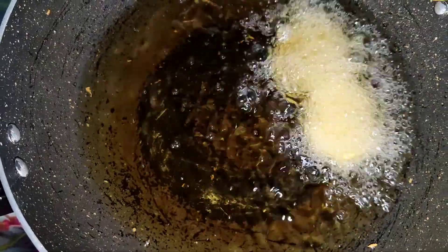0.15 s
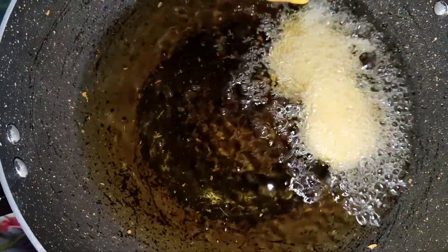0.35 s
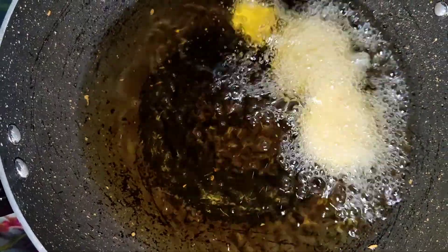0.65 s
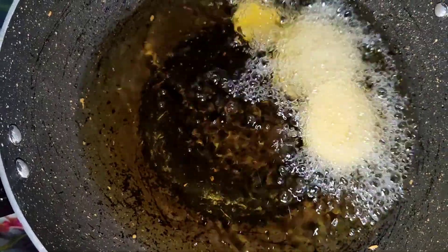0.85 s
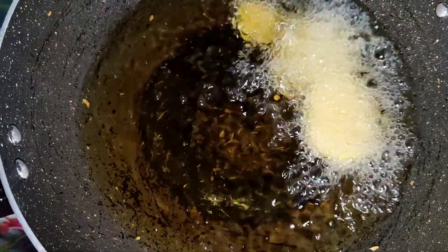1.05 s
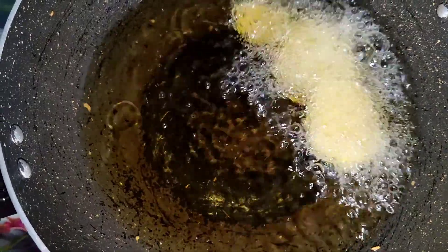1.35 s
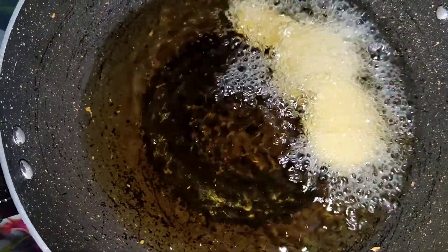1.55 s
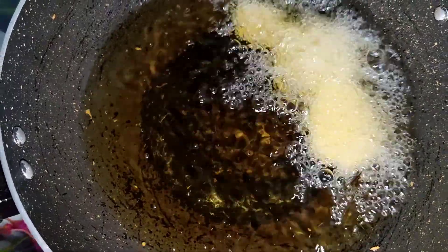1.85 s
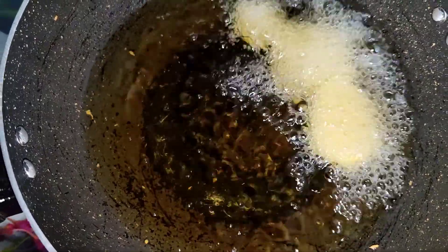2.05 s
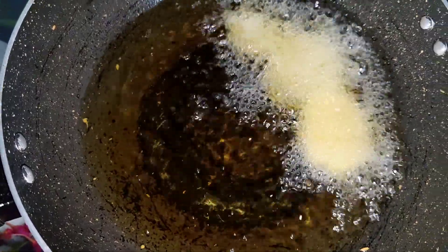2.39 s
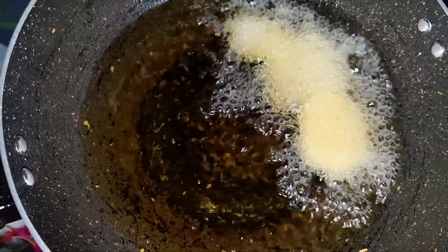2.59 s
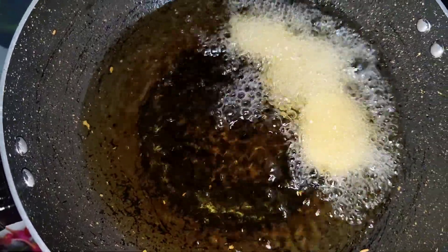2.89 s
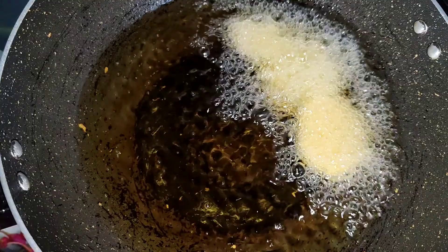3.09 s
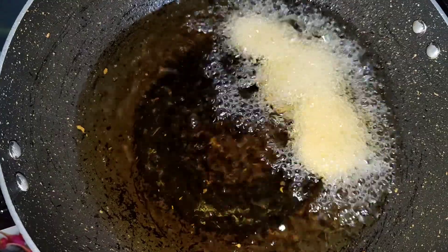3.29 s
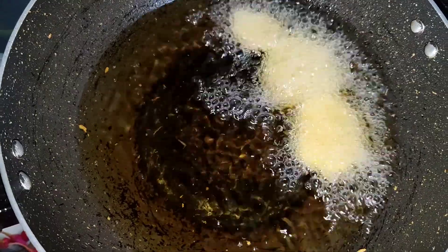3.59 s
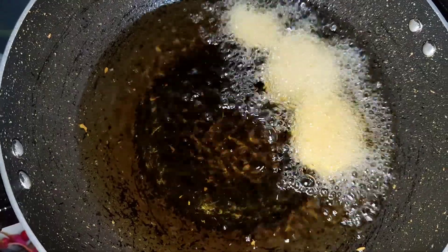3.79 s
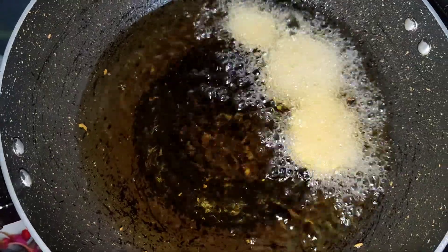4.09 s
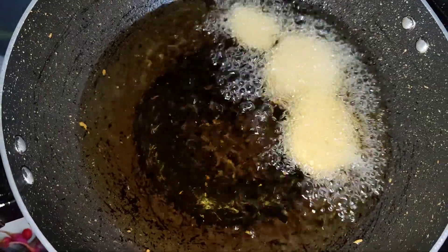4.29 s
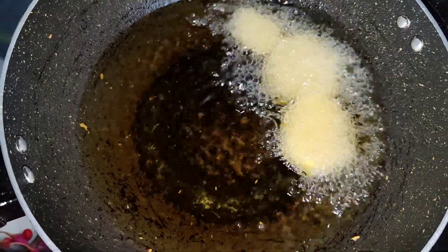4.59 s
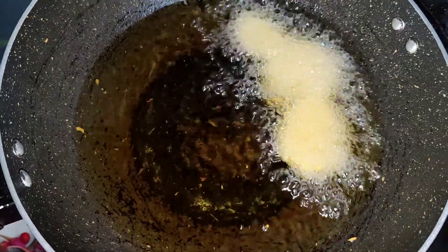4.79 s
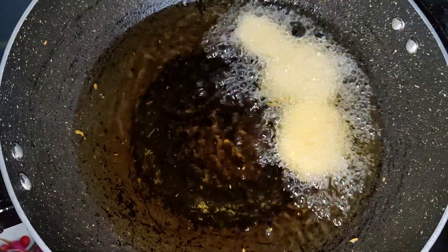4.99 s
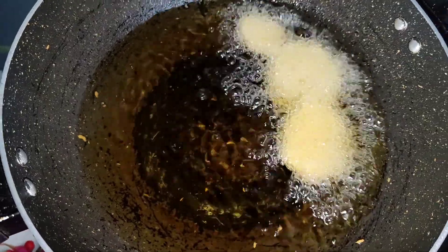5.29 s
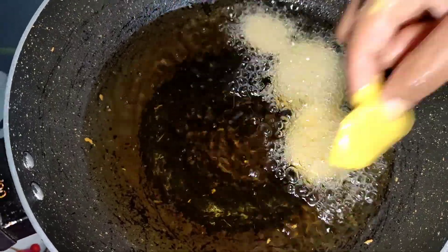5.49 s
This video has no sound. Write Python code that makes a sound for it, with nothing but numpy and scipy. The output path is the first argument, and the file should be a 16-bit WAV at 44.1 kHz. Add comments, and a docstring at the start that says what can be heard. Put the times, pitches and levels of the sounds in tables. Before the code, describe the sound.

Battered pieces fry in a deep metal pan, heard close from above. Soft bubbling and fine hiss run throughout over a low rumble. At about 0.7 s a new piece slips in with a bright steam fizz that fades, while round plops and spits crowd together. After about 3 s it calms to a thin sizzle with scattered pops and ticks. The stereo is uneven: left dull, right ringing in the upper mids.

```python
"""Battered pieces fry in hot oil in a deep metal pan, heard from close above in a kitchen.
Bursting steam bubbles are random clicks through resonances: bubbling, fizz, hiss and short whistles.
Single pops are swelling sines with a broad snap; spits and a plunge are bright steam; dry ticks are clicks.
Short reflections in the pan follow the single bursts, and a low noise rumble lies underneath.
Two microphone ports listen: the left one is dull, the right one has a cavity that rings near 2.6 kHz."""
import sys
import numpy as np
from scipy import signal
from scipy.fft import rfft, irfft, next_fast_len
from scipy.io import wavfile

SR = 44100
rng = np.random.default_rng(int(sys.argv[2]) if len(sys.argv) > 2 else 0)


def wav_record(signal):
    """Record a signal, one row per channel, as 16-bit PCM in the file named by sys.argv[1]."""
    frames = np.transpose(np.atleast_2d(signal))
    bounded = np.clip(frames, -1, 1)
    # unit amplitude maps onto the largest positive 16-bit level
    quanta = np.round(bounded * 32767).astype(np.int16)
    wavfile.write(sys.argv[1], SR, quanta)


N = 249022   # length [samples]
SIZE = next_fast_len(N + SR // 4)   # transform length with room for filter tails
HZ = np.maximum(np.fft.rfftfreq(SIZE, 1 / SR), 1)
CALM_DB = -55   # bubbling level of the calm fry, the reference for the vigour

# single bursting bubbles:
# (time [s], level [dB], pitch [Hz], nominal width [ms], film snap against the pop [dB])
POPS = [(0.023, -31, 2540, 3.5, -11), (0.1031, -18, 763, 3.74, -7), (0.192, -35, 880, 4.7, -23),
        (0.236, -37, 890, 2.4, -14), (0.2792, -36, 970, 3.3, -3), (0.2974, -37, 950, 3.4, -18),
        (.308, -38, 980, 5.6, -9), (0.3138, -32.5, 820, 2.2, -24), (0.3187, -33.5, 930, 3.4, -22),
        (0.3555, -37, 2484, 7.4, 6.5), (0.375, -36, 674, 2.5, -12), (0.3937, -33.5, 720, 1.6, -15),
        (0.4726, -37, 980, 2.25, -10), (0.4792, -27, 810, 2.77, -27), (0.4862, -30, 900, 1.94, -13),
        (0.613, -23, 864, 3.76, -22), (0.663, -27, 2450, 2.5, -23), (0.6744, -38.5, 710, 2.1, -8),
        (0.7058, -37, 840, 2.64, -13), (.7392, -27.5, 775, 3.4, -20), (.7615, -35.5, 846, 5.5, -16),
        (.7895, -33, 2260, 4, -8), (0.7997, -24.5, 794, 4.68, -5), (.888, -35, 2660, 3.7, -5),
        (0.9288, -19.5, 2380, 1.13, -12), (0.9295, -24.5, 704, 2.2, -24), (.975, -27, 703, 2.4, -19),
        (1.0262, -30, 2780, 1.66, -11), (1.0452, -32, 1000, 2, -12), (1.0669, -28.5, 770, 5.5, -10),
        (1.0874, -29, 820, 2.2, -18), (1.096, -20, 930, 2.1, -19), (1.1542, -31, 870, 2.13, 10.5),
        (1.2066, -27.5, 925, 1.7, -13), (1.2161, -27, 820, 1.65, -12), (1.2202, -29, 1140, 1.7, -14),
        (1.331, -31.5, 680, 1.75, -6), (1.3834, -29.5, 855, 2.07, -20), (1.3914, -30.5, 780, 1.44, -20),
        (1.443, -33.5, 1800, 1.53, -8), (1.5104, -20, 970, 1.42, -1.5), (1.548, -32.5, 870, 2.9, -23),
        (1.6528, -29, 1780, 1.33, -3), (1.6896, -36.5, 890, 0.9, -14), (1.7, -34, 830, 1.2, -15),
        (1.784, -25.5, 980, 0.8, -15), (1.7956, -29.5, 985, 2.6, -22), (1.854, -28.5, 2570, 2.1, -3),
        (1.916, -31.5, 1310, 2.3, 4.5), (1.944, -26.5, 930, 2.1, -27), (1.951, -33.5, 860, 3, -25),
        (2.0513, -29, 2580, 2.7, -14), (2.0646, -33, 840, 1.64, -24), (2.0783, -30, 835, 2.3, -19),
        (2.0939, -26, 1230, 2.05, -21.5), (2.1542, -31, 840, 3.3, 1), (2.1762, -31.5, 2460, 0.92, -6),
        (2.2122, -34.5, 2540, 2, -17), (2.228, -29, 1230, 1.65, -8), (2.2315, -31.5, 940, 2.45, -20),
        (2.2548, -37, 790, 1.5, 12), (2.3623, -24.5, 810, 2.5, -23.5), (2.3854, -29.5, 910, 2.45, -17),
        (2.567, -36.5, 780, 2.15, -21.5), (2.5903, -33, 760, 2.55, -15), (2.6714, -44, 1290, 2.4, -14.5),
        (2.6776, -36, 610, 2, 6.5), (2.7018, -28, 643, 2.75, 1.5), (2.7223, -27, 2570, 1.4, -5.5),
        (2.7248, -32.5, 2890, 4.5, 2), (2.731, -31, 2950, 1.8, -9), (2.734, -29.5, 2850, 3, -3),
        (2.742, -42, 2980, 3.7, -4), (2.752, -41, 2960, 2.7, 3.5), (2.8757, -33.5, 806, 1.65, -14),
        (3.077, -37.5, 2300, 2.6, -16), (3.1741, -36.5, 980, 1.5, -13), (3.2492, -38, 2690, 4.3, -9),
        (3.2924, -35.5, 800, 1.15, -14), (3.357, -38.5, 2420, 2.9, 8.5), (3.401, -34, 680, 1.14, -21),
        (3.6657, -37, 856, 1.9, -8), (3.7719, -38, 1410, 0.95, 5.5), (3.789, -41, 1330, 1.3, -20),
        (3.8459, -32, 960, 1.43, -12), (3.8558, -35.5, 1150, 1.46, 5.5), (3.9497, -26, 2550, 2.47, -3),
        (4.0406, -21, 3920, 1.07, -23), (4.1078, -34, 2560, 2.5, 1.5), (4.1155, -39.5, 2450, 4.3, -11),
        (4.2616, -34.5, 1040, 2.5, -12), (4.262, -25.5, 2670, 2.44, 1), (4.2691, -15.5, 2630, 1.8, -13),
        (4.2795, -38, 2570, 2.4, -20), (4.2836, -42, 2720, 3.5, -20), (4.3892, -41, 880, 1.3, 10.5),
        (4.483, -40, 1200, 0.94, -20), (4.4864, -35, 1300, 0.96, -17), (4.4955, -36.5, 1200, 1.35, 7),
        (4.57, -34, 340, 2.3, -29), (4.623, -22.5, 1340, 1.47, -13), (4.6246, -23, 2280, 2, -8),
        (4.6195, -34, 1500, 3, -20), (4.713, -39, 1600, 2.7, -17), (4.7512, -37.5, 2830, 2.3, 6),
        (4.7862, -33, 850, 1.75, -11), (4.796, -35.5, 2170, 0.85, 4), (4.8047, -39, 910, 1.9, -14),
        (4.844, -41.5, 1490, 3.8, -36), (4.997, -28.5, 2180, 1, -29), (5.014, -23.5, 2420, 1.53, -10.5),
        (5.119, -27.5, 2280, 3.1, -12.5), (5.5435, -35, 2380, 2.5, -5), (5.5588, -34, 2440, 3, -4)]
# colour of the scene at each microphone port: (frequency [Hz], level [dB])
LEFT_PORT = [(40, 2), (150, -6), (220, -6), (400, -6.5), (900, -2), (1350, -1), (2050, -16.5),
             (2900, -19.5), (4300, -33.5), (5500, -37), (6000, -53.5), (6500, -36.5), (7100, -41.5),
             (7600, -44.5)]
RIGHT_PORT = [(40, 2.5), (150, -6), (400, -4.5), (850, -4.5), (1150, -4.5), (2000, -2.5), (2250, -4),
              (2450, 6), (2750, 4), (3050, -3), (3600, -19.5), (5300, -20.5), (6600, -41), (7100, -35.5),
              (7600, -59.5)]


def fry():
    """Bubbling, fizz, hiss and whistles: click streams through resonances, all driven by the vigour."""
    swing_db = vigour(np.arange(N) / SR)

    bubbling = [bubbles(crackle(700.0, 2.9, 3.5), 500, 1700, sharpness=9.0) for side in range(2)]
    # the commonest bubble size rings on a little, more in a vigorous fry
    plop_gain = from_db(2 + 0.81 * swing_db)
    bubbling = [x + plop_gain * resonance(x, 880, width_hz=90) for x in bubbling]
    fizz = [bubbles(crackle(2000.0, 3.5, 4.3), 1400, 5500, sharpness=2.4) for side in range(2)]
    hiss = [pan_wall(band(crackle(12000.0, 1.9, 4.3), 3084, 8300), ring_db=4.0) for side in range(2)]
    # bubbles that ring on as short tones
    whistles = [bubbles(crackle(250.0, 3.2, 4.0), 2250, 3200, sharpness=40.0) for side in range(2)]

    # each layer: level in the calm fry [dB] plus its share of the vigour's swing
    layers = [
        (bubbling, from_db(CALM_DB + swing_db) + froth(below_db=23.0, after_s=0.013)),
        (fizz, from_db(-62 + 0.11 * swing_db)),
        (hiss, from_db(-53.5 + 0.68 * swing_db)),
        (whistles, from_db(-59 + 0.4 * swing_db)),
    ]
    return sum(gain * rms_one(ports(spread(*pair))) for pair, gain in layers)


def vigour(s):
    """Vigour of the fry at given times, in dB against the calm fry."""
    # level of the bubbling: (time [s], level [dB])
    vigour_curve = [(0, -49), (.09, -54.5), (.17, -50.5), (.45, -55.5), (.61, -58), (.71, -48),
                    (.97, -46.5), (1.27, -53), (1.6, -56), (2.23, -54), (2.89, -57.5), (3.66, -59),
                    (4.75, -58), (5.65, -58.5)]
    return np.interp(s, *np.transpose(vigour_curve)) - CALM_DB


def froth(below_db, after_s):
    """Extra bubbling gain: a swarm of small bubbles jumps up at each deep pop and decays."""
    swarm = np.zeros(N)
    for s, peak_db, hz, *rest in POPS:
        if hz < 1800:
            swarm[round(s * SR)] += from_db(peak_db - below_db)
    r = np.exp(-1 / (after_s * SR))
    return signal.lfilter([1], [1, -r], swarm + 1e-18)


def bubbles(clicks, low_hz, high_hz, sharpness):
    """Each click sets off one bubble of a random size, which rings at one of 12 pitches."""
    dealt = rng.integers(0, 12, N)
    return sum(resonance(clicks * (dealt == k), hz, hz / sharpness)
               for k, hz in enumerate(np.geomspace(low_hz, high_hz, 12)))


def crackle(per_s, uneven_db, clump_db):
    """Clicks at random moments, in clumps, with uneven sizes and random polarity; rms 1."""
    sizes = from_db(uneven_db * np.minimum(rng.exponential(1, N), 5)) * rng.choice([-1, 1], N)
    chance = per_s * from_db(clump_db * drift(15)) / SR
    return rms_one(sizes * (rng.random(N) < chance))


def pan_wall(x, ring_db):
    """Bright sounds carry the whistling modes of the pan, each coming and going."""
    # (pitch [Hz], width [Hz], level before flicker and ring_db [dB])
    wall_modes = [(3640, 19, -1.5), (3990, 9.8, -8.5), (4300, 13, -4), (4510, 28, 1), (4980, 66, -6.5),
                  (5500, 41, -6), (5900, 8.6, 0)]
    flicker_db = 4
    ring = sum(from_db(db + flicker_db * drift(2.3)) * resonance(x, hz, width)
               for hz, width, db in wall_modes)
    return x + from_db(ring_db) * ring


def pops():
    """Each pop is a ringing bubble and the broad snap of its film, coloured by the ports."""
    rings, snaps = np.zeros((2, N + SR)), np.zeros(N)
    t = np.arange(SR // 20) / SR
    for s, peak_db, hz, width_ms, snap_db in [*POPS, *faint_pops()]:
        cycles = max(width_ms / 1000 * hz, .7)
        # the swell starts before the listed moment
        at = max(round((s - cycles / hz / 1.762) * SR), 0)
        rings[:, at:at + len(t)] += from_db(peak_db) * port_balance(hz) * burst(hz, cycles, t)
        snaps[round(s * SR)] = from_db(peak_db + snap_db)
    return rings[:, :N] + band(snap(snaps, 660, 2600), 250, 4500)


def faint_pops():
    """Extra rows like those of the pops, at random moments, louder in a vigorous fry."""
    count = 50
    when, size, pitch = rng.random((count, 3)).T
    s = when * (N - 1) / SR
    level_db = -47 + 0.91 * vigour(s) + 2 * (2 * size - 1)
    hz = 880 * 2 ** (0.18 * (2 * pitch - 1))   # up to 0.18 octaves either way
    width_ms, snap_db = np.full(count, 1.86), np.full(count, -9.0)
    return np.transpose([s, level_db, hz, width_ms, snap_db])


def burst(hz, cycles, t):
    """A bubble swells for a moment, rings and dies while its pitch rises a little; envelope peak 1."""
    x = t * hz * 2.01 / cycles
    swell = (x * np.exp(1 - x)) ** 2
    return swell * np.sin(2 * np.pi * hz * t * (1 + 0.0012 * x))


def snap(clicks, low_hz, high_hz):
    """Broad clicks as the two ports hear them; a unit click peaks at 1 in the mean of the ports."""
    unit = band(ports([[1.], [1.]]), low_hz, high_hz).mean(axis=0)
    return band(ports([clicks, clicks]), low_hz, high_hz) / np.abs(unit).max()


def plunge():
    """A new piece slips in and its wet batter flashes to bright, dense steam that rings the pan wall."""
    full_s, rise_s, level_db, fade_db_per_s = 0.668, 0.013, -51.5, 24.5
    since = np.arange(N) / SR - full_s
    rise = np.clip(1 + since / rise_s, 0, 1) ** 2
    gain = rise * from_db(level_db - fade_db_per_s * np.maximum(since, 0))
    steam = [pan_wall(bubbles(crackle(2500.0, 2.6, 3.0), 4000, 7900, sharpness=30.0), ring_db=9.0)
             for side in range(2)]
    steam = signal.lfilter([1, -2, 1], [1], steam)   # finer droplets are brighter
    return gain * rms_one(ports(spread(*steam)))


def spits():
    """A droplet on the hot oil flashes to steam: a short, sputtering burst of bright noise."""
    # (time [s], level before the fade [dB], centre [Hz], width [octaves], fall by 60 dB [ms])
    droplets = [(0.664, -50, 5480, .08, 110), (.668, -58, 3700, .08, 90), (0.696, -53, 5100, 0.12, 60),
                (.789, -46, 5400, 0.2, 35), (0.826, -48, 4980, 0.08, 60), (.856, -45, 5220, 0.19, 26),
                (0.855, -48.5, 6800, 0.28, 28), (.885, -49.5, 5350, 0.26, 28), (0.931, -35, 4510, 0.13, 20),
                (0.943, -39.5, 5800, 0.25, 16), (0.954, -48, 6040, 0.2, 34), (1.015, -47, 4960, 0.23, 43),
                (1.026, -52, 3750, 0.45, 14), (1.051, -58, 5040, 0.11, 36), (1.088, -51, 5600, .6, 20),
                (1.153, -37, 5260, 0.17, 24), (1.201, -50, 5000, 0.63, 21), (1.271, -58, 5500, .2, 20.2),
                (2.701, -46, 4280, 0.35, 13), (2.721, -50.5, 4230, .3, 41), (2.73, -46.5, 4350, 0.33, 25),
                (2.805, -55, 7300, 0.28, 28), (3.948, -45.5, 4430, 0.28, 27), (4.0403, -37, 3930, 0.61, 61),
                (4.0405, -32.5, 5600, 0.28, 13), (4.112, -50, 4350, 0.08, 55),
                (4.494, -42.5, 4000, 0.42, 13)]
    out, t = np.zeros((2, N + SR)), np.arange(SR // 8) / SR
    for s, level_db, hz, width_oct, t60_ms in droplets:
        noise = rng.standard_normal((2, len(t)))
        edge = 2 ** (np.clip(width_oct, .05, 1) / 2)
        narrow = band(noise, hz / edge, hz * edge)
        steam = rms_one(band(narrow, hz / edge ** 2, hz * edge ** 2))
        fade = (1 - np.exp(-t / .001)) * from_db(-60000 * t / max(t60_ms, 8))
        at = round(s * SR)
        out[:, at:at + len(t)] += from_db(level_db) * port_balance(hz) * steam * fade
    return pan_wall(out[:, :N], ring_db=-5)


def ticks():
    """Dry ticks of the crust, short broad clicks: the loudest at their moments, fainter ones at random."""
    # (time [s], level [dB])
    crust_ticks = [(.006, -28), (0.037, -37), (2.814, -38.5), (2.85, -36), (2.924, -36), (3.0378, -30.5),
                   (3.05, -31.5), (3.137, -44), (3.146, -47), (3.307, -49), (3.368, -31), (3.414, -41.5),
                   (4.833, -38.5), (4.891, -46), (5.209, -41.5), (5.355, -37), (5.366, -35.5), (5.372, -40),
                   (5.391, -40.5), (5.397, -40), (5.479, -35), (5.519, -33.5), (5.553, -34)]
    clicks = from_db(-71) * crackle(100.0, 3.3, 6.0)
    for s, peak_db in crust_ticks:
        clicks[round(s * SR)] = from_db(peak_db)
    return snap(clicks, 200, 6400)


def chirp():
    """Bubbles that close up slowly: short, fluttering tones swell and fade while their pitch climbs."""
    # (time [s], length [s], level before flutter [dB], start pitch [Hz], end pitch [Hz])
    rising_tones = [(.767, 0.025, -45.5, 1290, 1690), (0.787, 0.0227, -33.5, 2516, 3070)]
    out, flutter = np.zeros((2, N)), from_db(3 * drift(160.0))
    for s, length_s, db, from_hz, to_hz in rising_tones:
        x, at = np.linspace(0, 1, round(length_s * SR)), round(s * SR)
        hz = from_hz + (to_hz - from_hz) * x
        tone = np.sin(np.pi * x) * np.sin(2 * np.pi * np.cumsum(hz) / SR)
        out[:, at:at + len(x)] += from_db(db) * port_balance(hz.mean()) * tone
    return out * flutter


def pan(x):
    """Dense short reflections inside the pan and off the hob, weak in the bass, different at each port."""
    t60_s, level_db, above_hz = .09, -6, 750
    t = np.arange(SR // 5) / SR
    echo = rng.standard_normal((2, len(t))) * from_db(-60 * t / t60_s) * (t > .002)
    echo /= np.sqrt(np.sum(echo ** 2, axis=1, keepdims=True))
    thinned = signal.lfilter(*signal.butter(1, above_hz, "high", fs=SR), x)
    return from_db(level_db) * signal.fftconvolve(thinned, echo, axes=1)[:, :N]


def rumble():
    """Low noise of the burner and the kitchen, slowly lumpy, following the vigour, with room modes."""
    # (pitch [Hz], width [Hz], level of the added ring [dB])
    room_modes = [(81, 13, -1), (107, 6, 4), (144.9, 10.3, 6.5)]
    air = ports(spread(*rng.standard_normal((2, N))))
    air = air + sum(from_db(db) * resonance(air, hz, width) for hz, width, db in room_modes)
    level_db = -53.5 + 0.23 * vigour(np.arange(N) / SR) + 1.2 * drift(6.0)
    return from_db(level_db) * rms_one(band(air, 23, 330))


def port_responses():
    """Causal (minimum-phase) response of each port, from its folded cepstrum."""
    log_gains = [at_hz(port, HZ) * np.log(10) / 20 for port in (LEFT_PORT, RIGHT_PORT)]
    cepstra = np.array([irfft(log_gain, SIZE) for log_gain in log_gains])
    half = SIZE // 2 - 1
    fold = np.r_[1, np.full(half, 2), 1, np.zeros(half)]
    return np.exp(rfft(cepstra * fold))


def ports(x):
    """Colouring by the left and right port."""
    return irfft(rfft(np.asarray(x), SIZE) * port_responses(), SIZE)[:, :N]


def port_balance(hz):
    """Left and right gain of a tone, mean 1."""
    gains = from_db([at_hz(LEFT_PORT, hz), at_hz(RIGHT_PORT, hz)])
    return gains[:, None] / gains.mean()


def spread(mid, side):
    """Two sources mixed so that the ports agree most from bass to low mids and least in the top."""
    # (frequency [Hz], left-right likeness [0 to 1])
    likeness = [(60, 0.48), (130, 0.98), (300, 0.77), (660, 0.93), (1460, 0.65), (3250, 0.62), (7230, 0.17)]
    alike = np.clip(at_hz(likeness, HZ), 0, 1)
    mid = np.sqrt(1 + alike) * rfft(mid, SIZE)
    side = np.sqrt(1 - alike) * rfft(side, SIZE)
    return irfft(np.array([mid + side, mid - side]), SIZE)[:, :N]


def resonance(x, hz, width_hz):
    """A two-pole resonance with gain 1 on top."""
    r = np.exp(-np.pi * width_hz / SR)
    feed = np.array([1, 0, -1]) * (1 - r * r) / 2
    return signal.lfilter(feed, [1, -2 * r * np.cos(2 * np.pi * hz / SR), r * r], x + 1e-18)


def band(x, low_hz, high_hz):
    """Band-pass."""
    return signal.sosfilt(signal.butter(2, [low_hz, high_hz], "band", fs=SR, output="sos"), x)


def drift(rate_hz):
    """Slow random wander with rms 1: noise through two equal low-passes, made at every 16th sample."""
    r = np.exp(-32 * np.pi * rate_hz / SR)
    noise = rng.standard_normal(N // 16 + 3002)
    slow = signal.lfilter([1], [1, -2 * r, r * r], noise)[3000:]   # skip the run-in
    return np.interp(np.arange(N) / 16, np.arange(len(slow)), rms_one(slow))


def at_hz(points, hz):
    """Read a table on a log-frequency axis."""
    table_hz, values = np.transpose(points)
    return np.interp(np.log(hz), np.log(table_hz), values)


def rms_one(x):
    """Scale so that the mean of the channels has rms 1."""
    return x / np.sqrt(np.mean(np.atleast_2d(x).mean(axis=0) ** 2) + 1e-20)


def from_db(db):
    """Decibels to gain."""
    return 10 ** (np.asarray(db) / 20)


def scene():
    """Single bursts with their reflections over the steady fry, the plunge and the rumble."""
    bursts = pops() + chirp() + spits() + ticks()
    return fry() + bursts + pan(bursts) + plunge() + rumble()


def record(dry):
    """The top is cut steeply below 8.1 kHz; a faint converter hiss stays."""
    cut = signal.sosfilt(signal.cheby2(20, 70, 8100, fs=SR, output="sos"), dry)
    return cut + from_db(-101) * rng.standard_normal(dry.shape)


dry = scene()
out = record(dry)
wav_record(out)
```